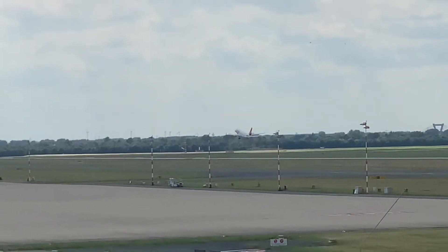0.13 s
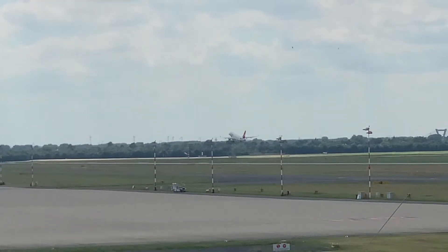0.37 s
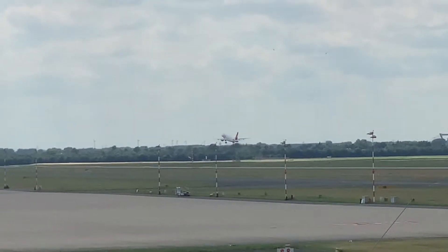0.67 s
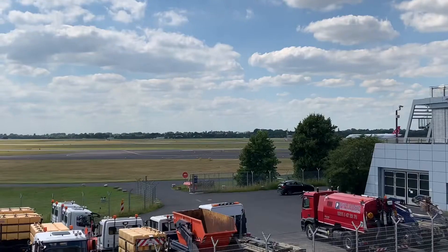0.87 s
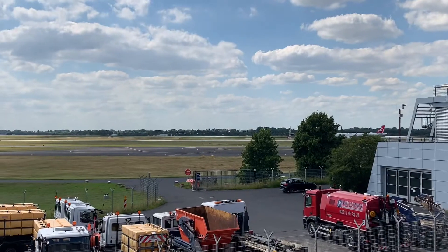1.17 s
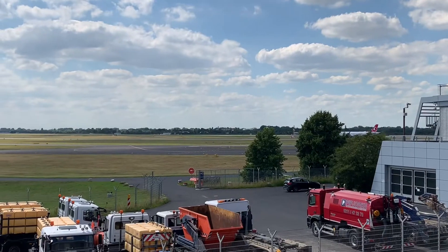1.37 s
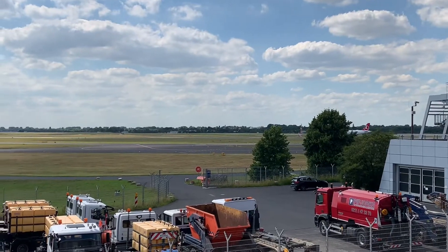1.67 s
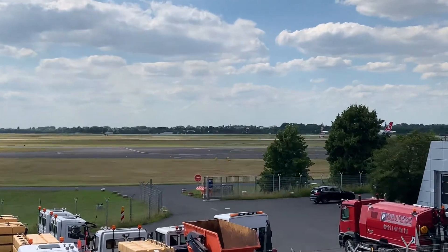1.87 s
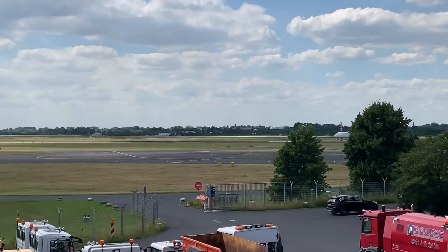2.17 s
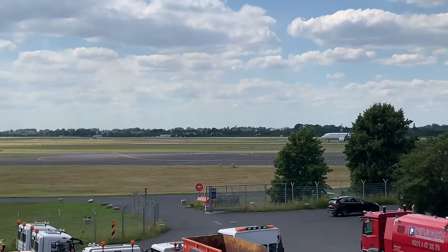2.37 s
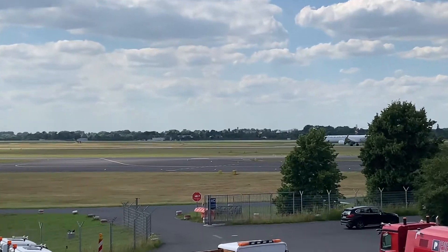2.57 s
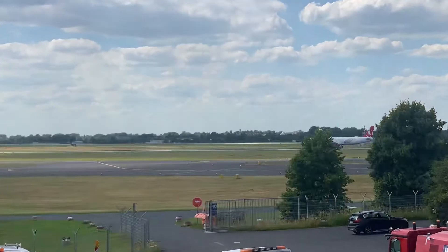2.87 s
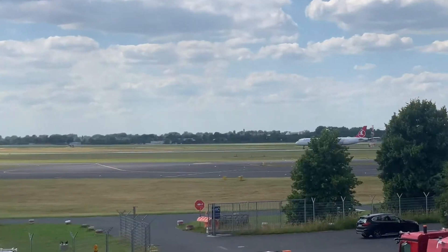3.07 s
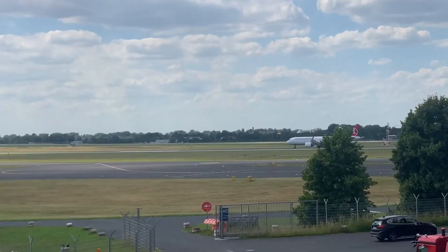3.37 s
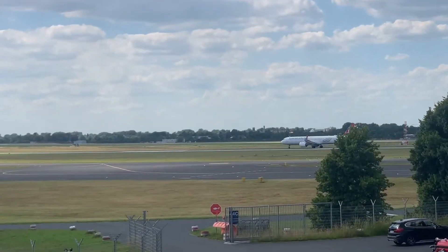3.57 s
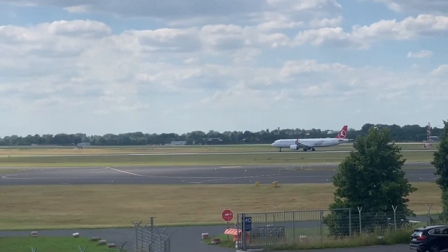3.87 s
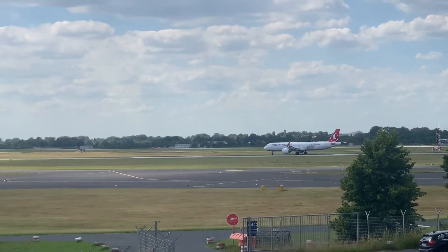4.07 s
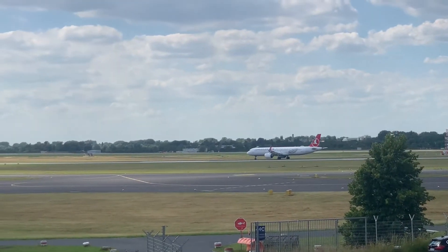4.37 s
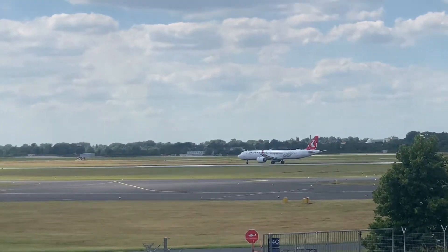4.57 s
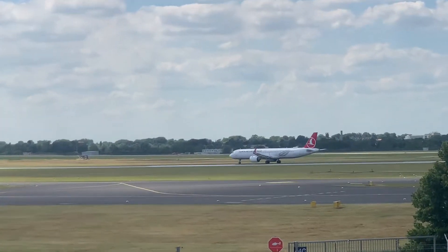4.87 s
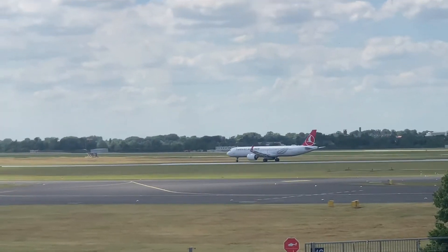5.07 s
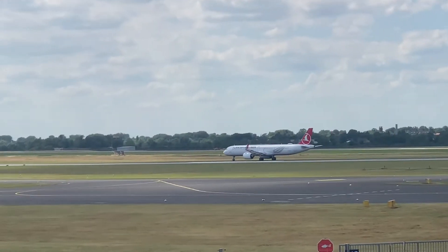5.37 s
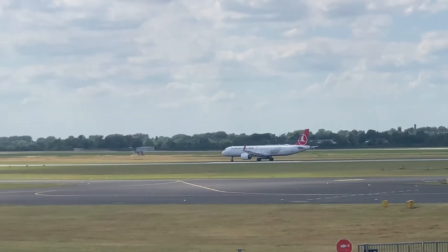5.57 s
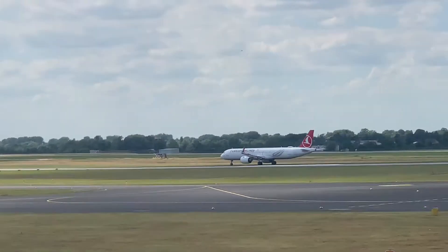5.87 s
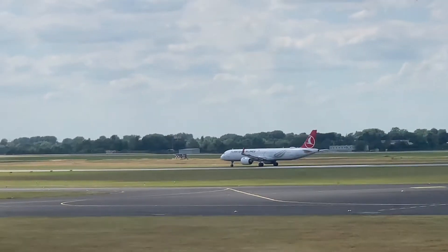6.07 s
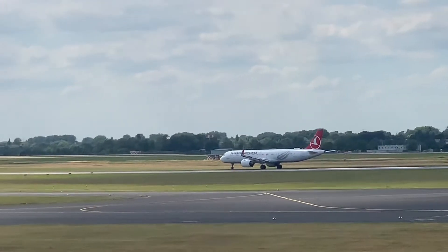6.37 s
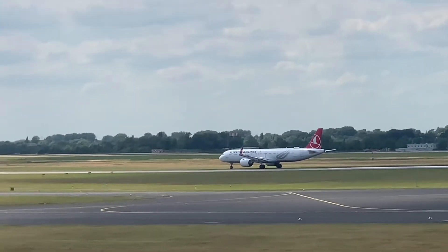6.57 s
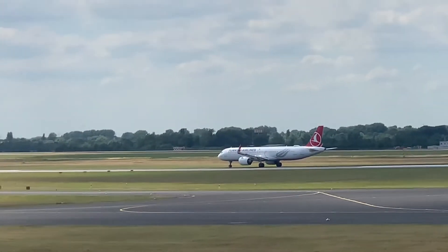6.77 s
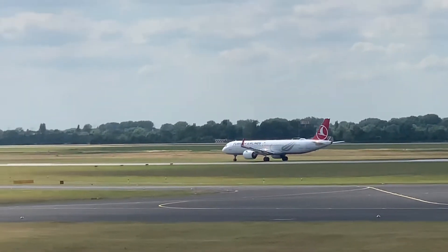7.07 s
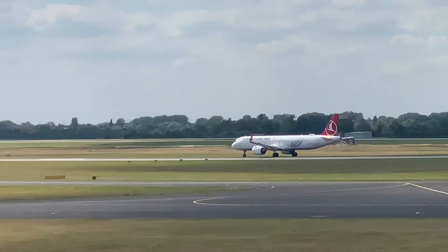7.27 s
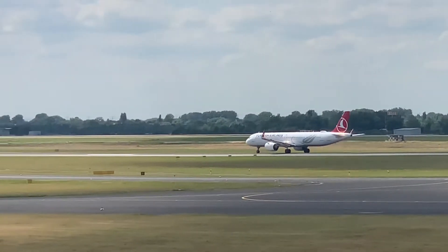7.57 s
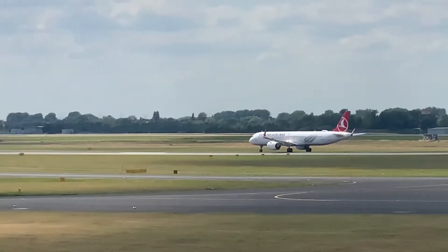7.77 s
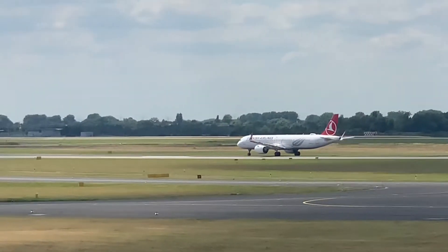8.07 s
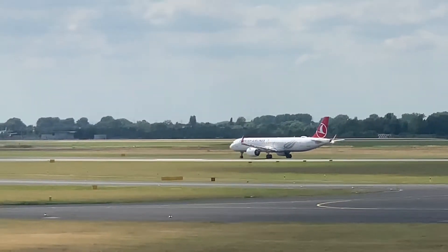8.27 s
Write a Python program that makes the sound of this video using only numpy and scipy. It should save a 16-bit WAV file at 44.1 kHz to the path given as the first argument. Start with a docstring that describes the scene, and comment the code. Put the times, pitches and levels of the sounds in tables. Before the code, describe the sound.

Outdoors at an airport, a far departing jet gives a dull low rumble with faint hum for under a second. A tiny click and soft thump mark an abrupt cut to a nearer rolling airliner: deep exhaust rumble, hollow roar, airy intake rush and a gently sinking fan tone. Higher turbine whines come and go, clearer near the end. Stereo handheld microphone, faint hiss and a few handling ticks.

```python
"""Two airliners from an airport terrace

Scene one: a far airliner climbs away, a dull rumble of filtered noise with a faint hum. It ends in a click,
then a soft low thump as scene two sets in: a nearer one rolls by. Shaped noise makes its exhaust rumble
and roar and its intake hiss; tones with steady and scattered parts make a slowly sinking fan and two
turbine lines that whine above it. Patches, flutter and swells of level make it flicker in the moving air."""
import sys
import numpy as np
from scipy import signal
from scipy.fft import rfft, irfft, next_fast_len
from scipy.io import wavfile
from scipy.ndimage import uniform_filter1d, map_coordinates

SR = 44100
rng = np.random.default_rng(int(sys.argv[2]) if len(sys.argv) > 2 else 0)


def log_audio(samples):
    """Write samples as a 16-bit WAV file to the path given in sys.argv[1]."""
    # one column per channel
    frames = np.atleast_2d(samples).T
    # limit to full scale, then quantise
    limited = np.clip(frames, -1, 1)
    pcm = np.round(limited * 32767).astype(np.int16)
    wavfile.write(sys.argv[1], SR, pcm)


N = 371763
TIME = np.arange(N) / SR


def amp(db):
    """Decibels to gain."""
    return 10 ** (np.asarray(db) / 20)


def unit(x):
    """Scaled to rms 1."""
    return x / np.sqrt(np.mean(x ** 2) + 1e-20)


def along(points, hz):
    """(freq_hz, value) points interpolated on a log frequency axis."""
    freq_hz, value = np.transpose(points)
    return np.interp(np.log(hz + 1), np.log(freq_hz + 1), value)


def shaped(spectrum):
    """Gain function of a (freq_hz, gain_db) table."""
    return lambda hz: amp(along(spectrum, hz))


def wobble(knots_per_s):
    """Smooth random curve through normally distributed knots."""
    knots = rng.standard_normal(int(N * knots_per_s / SR) + 4)
    return map_coordinates(knots, [TIME * knots_per_s], mode="nearest")


def bump(centre_s, half_length_s, order=2):
    """Swell of height 1; a higher order flattens its top."""
    return np.exp(-.5 * np.abs((TIME - centre_s) / half_length_s) ** order)


def filtered(x, response):
    """x through a frequency response, by zero-padded FFT."""
    size = next_fast_len(N + 8192)
    freq_hz = np.fft.rfftfreq(size, 1 / SR)
    return irfft(rfft(x, size) * response(freq_hz), size)[..., :N]


# runway noise at the microphone pair: freq_hz, likeness (left-right correlation), left_lead_rad
RUNWAY_IMAGE = [(40, 0.999, -0.12), (130, 0.996, -0.27), (260, 0.91, -0.41), (310, 0.56, -0.43),
                (340, 0.17, -0.41), (350, 0.05, 1.75), (480, 0.49, 2.58), (550, 0.61, 2.46),
                (650, 0.77, 3.17), (780, 0.4, 3.31), (850, 0.28, 1.35), (930, 0.37, 1.24),
                (1060, 0.06, 2.29), (1160, 0.07, 2.15), (1270, 0.34, 3.17), (1450, 0.34, 5.48),
                (1730, 0.84, 6.2), (1970, 0.07, 6.56), (2060, 0.11, 4.57), (2350, 0.32, 4.72),
                (2560, 0.68, 5.39), (2680, 0.57, 5.5), (2930, 0.54, 6.88), (3340, 0.18, 7.28),
                (3490, 0.14, 9.9), (3650, 0.4, 10.89), (4550, 0.2, 13.62), (8060, 0.09, 12.6)]
# runway balance: freq_hz, left_minus_right_db
RUNWAY_PAN = [(60, -2.5), (97, -3), (160, -3.5), (260, -8.5), (410, -5.5), (670, 2), (1090, -0.5),
              (1770, 0.0), (2870, 0), (4650, -1)]


def turbulence(colour, image=RUNWAY_IMAGE, pan=RUNWAY_PAN):
    """Stereo noise of rms 1: many random eddies, coloured, partly alike at the two microphones."""
    image = np.array(image)

    def mid_side_gain(hz):
        angle = np.arccos(np.clip(along(image[:, :2], hz), -1, 1)) / 2
        return colour(hz) * [np.cos(angle), np.sin(angle)]

    def left_right_gain(hz):
        lean = amp(np.outer([.5, -.5], along(pan, hz)))
        lead = np.exp(1j * np.outer([.5, -.5], along(image[:, ::2], hz)))
        return lead * lean / np.linalg.norm(lean, axis=0)

    mid, side = filtered(rng.standard_normal((2, N)), mid_side_gain)
    return unit(filtered(np.array([mid + side, mid - side]), left_right_gain))


def band(centre_hz, width_hz):
    """Runway noise of rms 1 through one resonance; gain is 1/4 at width_hz from the centre."""
    return turbulence(lambda hz: 1 / (1 + ((hz - centre_hz) / width_hz) ** 2) ** 2)


def through_air(x, patchy_db):
    """Eddies on the way focus and scatter sound in short time-frequency patches, alike at both microphones."""
    z = signal.stft(x, nperseg=1024)[2]
    field = rng.standard_normal(z.shape[1:])
    field = uniform_filter1d(field, size=9, axis=0)
    field = uniform_filter1d(field, size=6, axis=1)
    patches = z * amp(patchy_db * unit(field))
    return unit(signal.istft(patches, nperseg=2 * (len(field) - 1))[1][:, :N])


def tone(hz, knots_per_s, direct):
    """Line of rms 1: steady direct part plus random scatter that partly differs at each microphone."""
    own = np.array([wobble(knots_per_s) + 1j * wobble(knots_per_s) for _ in range(2)])
    shared = wobble(knots_per_s) + 1j * wobble(knots_per_s)
    scattered = shared + 0.9 * own
    swing = (direct + scattered) / np.hypot(direct, np.std(scattered))
    carrier = np.exp(2j * np.pi * np.cumsum(hz * np.ones(N)) / SR)
    return unit((swing * carrier).real)


# better carriage of engine sound by the air: centre_s, half_length_s, surge_db (before each sound's share)
SURGES = [(2.7, 0.41, 1.5), (5.923, 0.29, 4), (7.732, 0.22, 3)]


def passing_db(turn_s, turn_db, rise_db_per_s, fall_db_per_s, share):
    """Level with one slope before turn_s, another after (negative values reverse), plus a share of the surges."""
    surge_db = sum(db * bump(s, length) for s, length, db in SURGES)
    before_s = np.maximum(turn_s - TIME, 0)
    after_s = np.maximum(TIME - turn_s, 0)
    return turn_db - rise_db_per_s * before_s - fall_db_per_s * after_s + share * surge_db


# microphone hiss colour: freq_hz, relative_gain_db
FLOOR_COLOUR = [(500, -2.5), (5000, 5), (8000, -1), (10000, -3), (12000, -12.5), (15000, -12.5)]


def microphone_hiss():
    """Faint steady broadband noise of the microphones."""
    return amp(-72) * turbulence(shaped(FLOOR_COLOUR))


# handling ticks and rustles: centre_s, half_length_s, level_db (before flutter)
TOUCHES = [(2.77, .06, -74), (3.964, .003, -66), (7.345, .008, -75)]


def handling():
    """Fingers tick and rustle: short fluttering bursts of high noise."""
    touch = sum(amp(db) * bump(s, length) for s, length, db in TOUCHES)
    return touch * amp(2.5 * wobble(90)) * band(7900, width_hz=1900)


CUT_S, RESUME_S = .696, .704
CLICK_DB, CLICK_DECAY_S = -34, .0004
THUMP_HZ, THUMP_DB, THUMP_DECAY_S = 400, -21, .005


def click_and_thump():
    """Sharp decaying pulse as scene one ends, then a soft low thump (decaying sine) as scene two sets in."""
    def decay(start_s, decay_s):
        return (TIME >= start_s) * np.exp(-np.abs(TIME - start_s) / decay_s)

    click = amp(CLICK_DB) * decay(CUT_S, CLICK_DECAY_S)
    thump = np.sin(2 * np.pi * THUMP_HZ * (TIME - RESUME_S))
    return click + amp(THUMP_DB) * decay(RESUME_S, THUMP_DECAY_S) * thump


# far jet colour: freq_hz, relative_gain_db
FAR_COLOUR = [(20, -35), (32, -18), (45, -4), (68, 2.5), (110, -9), (160, -11), (250, -16.5), (360, -15),
              (530, -23), (760, -19), (1020, -22.5), (1300, -23), (1680, -31), (1860, -29.5), (2350, -34),
              (2530, -40), (2900, -37), (3750, -43.5), (4600, -50.5), (6000, -59), (8000, -69),
              (10000, -71), (14000, -78)]
# far jet at the microphone pair: freq_hz, likeness (left-right correlation), left_lead_rad
FAR_IMAGE = [(100, 0.994, -0.25), (190, 0.92, -0.1), (270, 0.59, 0.4), (370, 0.8, 1.84), (460, 0.75, 1.74),
             (650, 0.28, 3.79), (720, 0.25, 5.7), (1210, 0.51, 9.39), (1580, 0.43, 8.83),
             (3650, 0.21, 10.69), (3980, 0.32, 12.69)]
# far jet balance: freq_hz, left_minus_right_db
FAR_PAN = [(60, -3.5), (160, -4), (260, -11), (670, 8.5), (1100, -1)]
FAR_HUM_HZ, FAR_HUM_DB = 368, (-52, -55.5)  # hum and its octave


def far_airliner():
    """Departing jet: noise dulled by distance and patchy from the air, plus a faint hum and octave."""
    noise = turbulence(shaped(FAR_COLOUR), FAR_IMAGE, FAR_PAN)
    roar = amp(-30.5) * through_air(noise, patchy_db=1.54)
    hum = sum(amp(db) * tone(k * FAR_HUM_HZ, knots_per_s=22, direct=2.5)
              for k, db in enumerate(FAR_HUM_DB, 1))
    return roar + hum


# swelling bands, hollow below, rasping above; the one at 3750 Hz is a faint early fan overtone:
# centre_s, half_length_s, freq_hz, width_hz, level_db
RESONANCES = [(1.123, 0.14, 203, 26, -29.5), (1.74, 0.16, 350, 56, -30.5), (2.05, 0.16, 387, 103, -29.5),
              (2.35, 0.22, 346, 30, -35), (1.795, .17, 211, 31, -30), (2.32, 0.19, 199, 35, -32),
              (2.896, .13, 181, 95, -28), (3.19, 0.2, 400, 110, -37.5), (1.4, .5, 1100, 440, -49.5),
              (2.55, 0.32, 980, 180, -48.5), (2.797, 0.39, 1560, 360, -45.5),
              (1.86, 0.38, 2050, 410, -48.5), (5.75, 0.074, 150, 77, -34), (5.85, 0.93, 2710, 760, -50),
              (1.2, 1, 3750, 150, -59)]
FLUTTER_DB, FLUTTER_KNOTS_PER_S = 1.8, 17


def resonances():
    """Bands of noise swell, overlap and flutter, most of them in the roar, one a faint fan overtone."""
    out = np.zeros((2, N))
    for s, length, hz, width_hz, db in RESONANCES:
        level_db = db + FLUTTER_DB * wobble(FLUTTER_KNOTS_PER_S)
        out += amp(level_db) * bump(s, length) * band(hz, width_hz)
    return out


# hollow ring that climbs as the aircraft moves: time_s, freq_hz, level_db
RING = [(.7, 465.5, -48.5), (1.5, 477.7, -46), (2.3, 510, -45), (2.9, 551.7, -40), (3.25, 562.3, -43.5),
        (3.6, 578.2, -58), (4.4, 629.8, -51.5), (5.8, 634, -50), (8.4, 636, -56)]


def climbing_ring():
    """Narrow band of the roar, reinforced by a reflection, slides upwards by frequency shift and flutters."""
    s, hz, db = np.transpose(RING)
    shift_hz = np.interp(TIME, s, hz) - hz.mean()
    shift = np.exp(2j * np.pi * np.cumsum(shift_hz) / SR)
    noise = signal.hilbert(band(hz.mean(), width_hz=75), next_fast_len(N))[:, :N]
    level_db = np.interp(TIME, s, db) + FLUTTER_DB * wobble(FLUTTER_KNOTS_PER_S)
    return amp(level_db) * (noise * shift).real


# intake noise colours: freq_hz, relative_gain_db
RUSH_COLOUR = [(310, -35.5), (520, -3), (650, 1.5), (801, 0), (867, -3.5), (945, -0.5), (1110, -3),
               (1300, -6.5), (1620, -6.2), (1720, -8), (1870, -7.5), (2260, -10.5), (2410, -13.5),
               (2640, -14.5), (3400, -19), (4420, -46.5), (7480, -120)]
HISS_COLOUR = [(1700, -35), (2900, -4), (3500, -7.5), (4100, -9), (5000, -17.5), (5800, -24.5),
               (6700, -23.5), (7800, -35), (10000, -49), (15000, -59)]
# intake levels: turn_s, turn_db, rise_db_per_s, fall_db_per_s, surge_share
RUSH_PASS = (2.5, -37, 1.24, 0.63, 0.52)
HISS_PASS = (5, -53.5, -0.3, 1, 0.52)
# brighter gusts: centre_s, half_length_s, level_db
RASPS = [(.88, 0.16, -55), (1.828, 0.095, -46.5), (2.36, 0.059, -43.5), (3.649, 0.18, -56)]
SIZZLE_DB, SIZZLE_END_S, SIZZLE_RELEASE_S = -56, 2.53, 0.72


def intake():
    """Air torn by the fan blades: rush, thinner hiss, a sizzle that holds then dies away, gusts of rasp."""
    flutter_db = 0.22 * wobble(15)
    rush = through_air(turbulence(shaped(RUSH_COLOUR)), patchy_db=1.53)
    rush = amp(passing_db(*RUSH_PASS) + flutter_db) * rush
    hiss = through_air(turbulence(shaped(HISS_COLOUR)), patchy_db=2.0)
    hiss = amp(passing_db(*HISS_PASS) + flutter_db) * hiss
    sizzle_fade = np.clip((SIZZLE_END_S - TIME) / SIZZLE_RELEASE_S, 0, 1)
    sizzle = amp(SIZZLE_DB) * sizzle_fade * band(4140, width_hz=1400)
    rasp_gain = sum(amp(db) * bump(s, length) for s, length, db in RASPS)
    rasp = rasp_gain * band(2720, width_hz=1400)
    return rush + hiss + sizzle + rasp


# blade harmonics 1-4: line_db, skirt_db (relative)
FAN_ORDERS = [(1, -3.5), (2, -2), (-6, -4.5), (-13.5, -10)]
# level of harmonic 1, then of the overtones: turn_s, turn_db, rise_db_per_s, fall_db_per_s, surge_share
FAN_PASS = (2, -54.5, 4, 1.6, 2)
OVERTONE_PASS = (6, -54.5, 1.5, 7, 0.23)
# brief flares and dips: centre_s, half_length_s, harmonic_1_db, harmonic_2_db, harmonic_3_db, harmonic_4_db
FLARES = [(1.1, .25, 4, 0, -2.5, 3), (1.46, .09, 6, 0, 0, 2), (1.76, .06, 2, 6, 0, 8),
          (2.19, .04, 1, 0, 5, 14), (2.34, .06, 6, 9, 5, 3), (2.72, .043, 2, 13, -3, 0),
          (3.1, .12, -2, 5, 0, 2), (3.58, .04, 0, 6, 3, 4), (4.96, .08, 9, 2, 2, 2),
          (5.29, .07, 8, 6, 4, 2), (5.53, .05, 4, 5, 1, 2), (5.65, .05, 10, -2, 4, 4),
          (5.81, .055, 2, 10, 4, 1), (6.06, .07, 6, 3, 7, 7), (6.21, .05, -1, 11, 6, 0),
          (6.39, .04, -5, 6, -2, 0), (6.63, .03, 0, 11, -2, 3), (6.92, .08, 0, 4, 2, 5),
          (7.62, .055, 6, 7, 13, 5), (7.8, .06, 5, 3, 0, 3), (7.98, .035, 0, 3, 13, 0)]
FAN_START_HZ, FAN_END_HZ, FAN_SINK_S = 930, 800, 6.8  # the end pitch is only approached


def fan():
    """Blade-rate harmonics with turbulent skirts glide down; each flickers and flares on its own."""
    sink = np.exp(-(TIME - RESUME_S) / FAN_SINK_S)
    blade_hz = FAN_END_HZ + (FAN_START_HZ - FAN_END_HZ) * sink
    blade_hz = blade_hz * (1 + 0.0014 * wobble(8))
    flares_db = sum(np.outer(dbs, bump(s, length)) for s, length, *dbs in FLARES)
    out = np.zeros((2, N))
    for k, ((line_db, skirt_db), flare_db) in enumerate(zip(FAN_ORDERS, flares_db), 1):
        line = amp(line_db) * tone(k * blade_hz, knots_per_s=38, direct=1.8)
        skirt = amp(skirt_db) * tone(k * blade_hz, knots_per_s=101.0, direct=0)
        level_db = passing_db(*(FAN_PASS if k == 1 else OVERTONE_PASS))
        out += amp(level_db + flare_db + 0.44 * wobble(15)) * (line + skirt)
    return out


# steady turbine lines: freq_hz
TURBINE_HZ = [2663, 2911]
# per turbine line: line_db, skirt_db_at_direct_2 (relative)
TURBINE_PARTS = [(-3.5, -4.5), (-2.5, -7.5)]
# whine lobes sweeping the terrace: centre_s, half_length_s, line_1_boost_db, line_2_boost_db
LOBES = [(3.85, .42, 11, 12.5), (3.68, .04, 5, 2), (4.3, .12, 7, 2), (5.65, .55, 10, 9), (6.33, .2, 12, 10),
         (7.65, .12, 10, 8), (7.92, .065, 8, 15), (8.26, .13, 12, 18)]
# whine clears as the engines turn towards the terrace: time_s, direct (amplitude)
WHINE_CLARITY = [(3.5, 2), (6.3, 3), (8, 6)]
# whistle level: turn_s, turn_db, rise_db_per_s, fall_db_per_s, surge_share
WHISTLE_PASS = (4.9, -86, 5, 1.7, 0)
BETWEEN_LOBES_DB, WHISTLE_HZ = -68, 6828


def turbine():
    """Two fixed-pitch lines come and go in lobes, rough then clear; a thin whistle lies above."""
    lobes_db = sum(np.outer(dbs, bump(s, length, order=4)) for s, length, *dbs in LOBES)
    levels_db = BETWEEN_LOBES_DB + lobes_db
    direct = np.interp(TIME, *np.transpose(WHINE_CLARITY))
    out = amp(passing_db(*WHISTLE_PASS)) * tone(WHISTLE_HZ, knots_per_s=25, direct=2)
    for hz, level_db, (line_db, skirt_db) in zip(TURBINE_HZ, levels_db, TURBINE_PARTS):
        line = amp(line_db) * tone(hz, knots_per_s=30, direct=direct)
        skirt = amp(skirt_db) * 2 / direct * tone(hz, knots_per_s=158.2, direct=0)
        out += amp(level_db + wobble(11)) * (line + skirt)
    return out


# exhaust noise colours: freq_hz, relative_gain_db
RUMBLE_COLOUR = [(18, -33.5), (25, -25.5), (33, -16), (43, -4), (55, 1), (73, 4), (98, 1), (112, -3.5),
                 (135, -8), (170, -15.5), (260, -49), (400, -100)]
ROAR_COLOUR = [(90, -26.5), (130, -7.5), (160, -6), (195, -4.5), (275, -12), (335, -10.5), (370, -9.5),
               (420, -16.5), (500, -19), (650, -34.5), (900, -51.5), (1500, -100)]
# roar level: turn_s, turn_db, rise_db_per_s, fall_db_per_s, surge_share
ROAR_PASS = (2.5, -31, -0.2, 0.53, 0.62)
# rumble swells and dips: centre_s, half_length_s, change_db
RUMBLE_SWELLS = [(1.1, 0.11, 0.5), (3.949, 0.51, 2.8), (4.533, 0.036, -5.5), (5.297, 0.36, 4),
                 (5.649, 0.078, 2), (7.0, 0.079, -1.5)]
# deep booms: centre_s, half_length_s, level_db
BOOMS = [(2.204, 0.23, -32), (3.804, .2, -33), (7.334, 0.18, -28), (7.996, 0.16, -26)]
RUMBLE_DB = -25.5  # between swells


def exhaust():
    """Large jet eddies rumble with a light throb and a few deep booms; smaller ones roar."""
    rumble_db = RUMBLE_DB + sum(db * bump(s, length) for s, length, db in RUMBLE_SWELLS)
    rumble = amp(rumble_db + 0.25 * wobble(22)) * turbulence(shaped(RUMBLE_COLOUR))
    roar = through_air(turbulence(shaped(ROAR_COLOUR)), patchy_db=1.5)
    roar = amp(passing_db(*ROAR_PASS)) * roar
    boom_gain = sum(amp(db) * bump(s, length) for s, length, db in BOOMS)
    booms = boom_gain * band(47.6, width_hz=10)
    return rumble + booms + roar


# drifting bearing of the rolling airliner: time_s, left_lag_ms
BEARING = [(.7, .11), (2.2, .07), (4.3, 0), (6.3, -.03), (8.4, -.02)]


def panned(pair):
    """As the bearing drifts, sound reaches one microphone slightly sooner than the other."""
    lag_samples = np.interp(TIME, *np.transpose(BEARING)) * SR / 1000
    return np.array([map_coordinates(x, [np.arange(N) - half * lag_samples], mode="nearest")
                     for x, half in zip(pair, (.5, -.5))])


def near_airliner():
    """All engine sounds of the rolling aircraft, on its drifting bearing."""
    return panned(resonances() + climbing_ring() + intake() + fan() + turbine() + exhaust())


def scene():
    """Two scenes over faint microphone hiss, 8 ms apart, with the click in the gap."""
    floor = microphone_hiss()
    first = np.clip((CUT_S - TIME) / .001, 0, 1) * (far_airliner() + floor)
    second = np.clip((TIME - RESUME_S) / .003, 0, 1) * (near_airliner() + floor + handling())
    return first + click_and_thump() + second


TOP_HZ = 15100


def record(dry):
    """Sharp band limit: nothing passes from TOP_HZ up."""
    return filtered(dry, lambda hz: hz < TOP_HZ)


dry = scene()
out = record(dry)
log_audio(out)
```